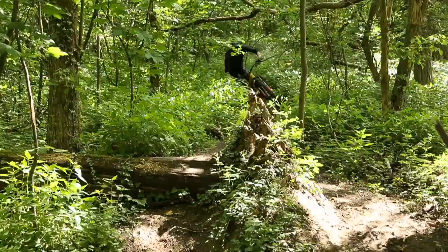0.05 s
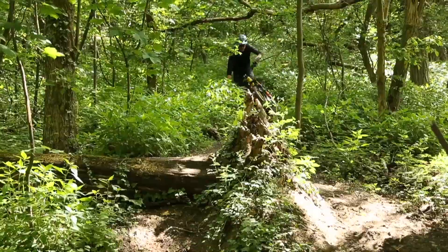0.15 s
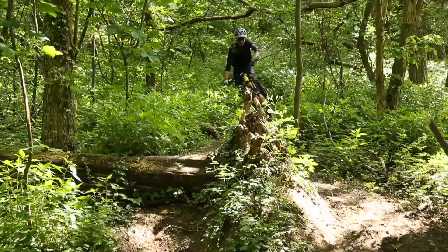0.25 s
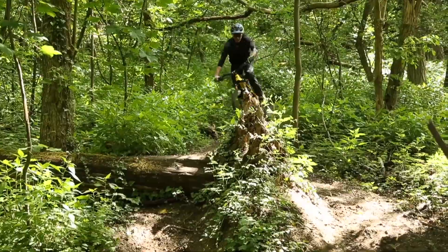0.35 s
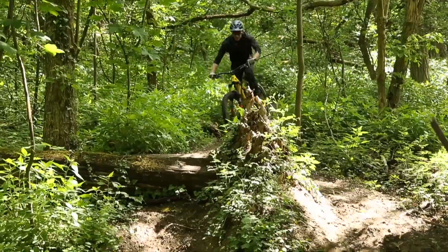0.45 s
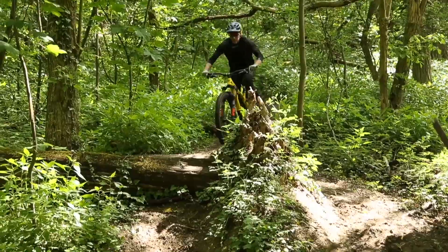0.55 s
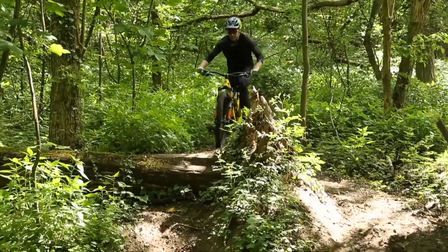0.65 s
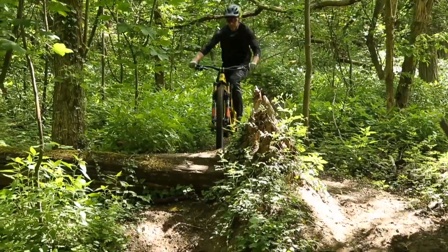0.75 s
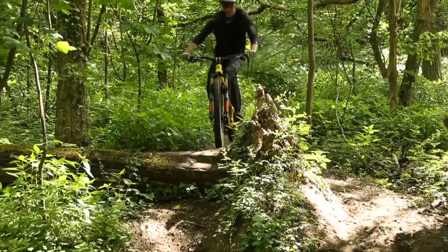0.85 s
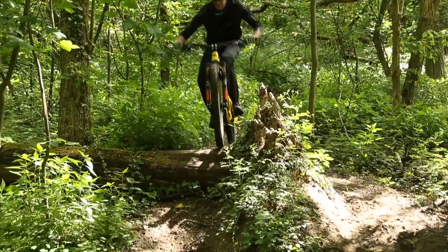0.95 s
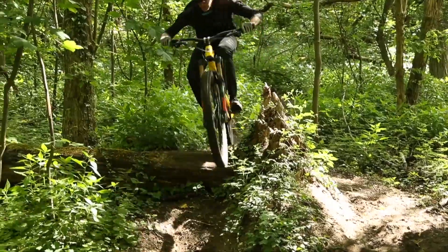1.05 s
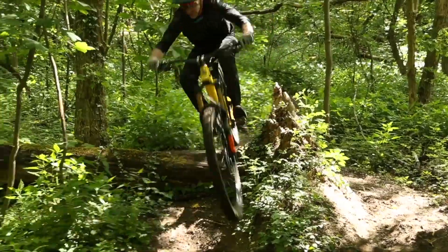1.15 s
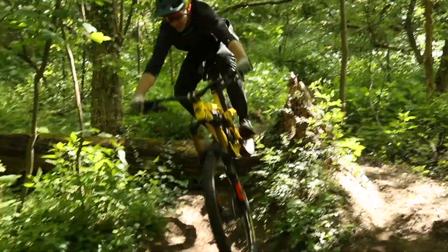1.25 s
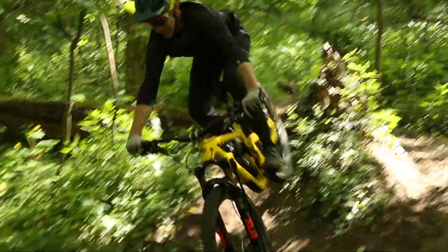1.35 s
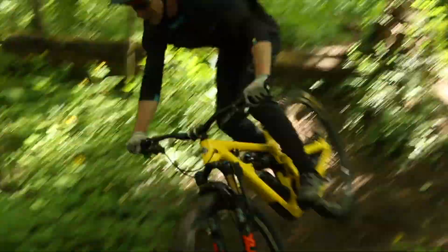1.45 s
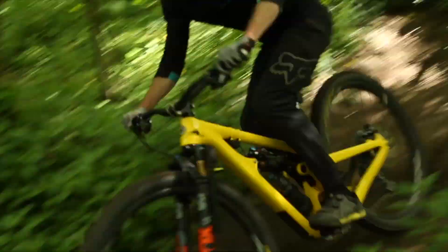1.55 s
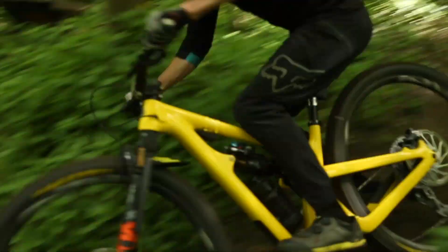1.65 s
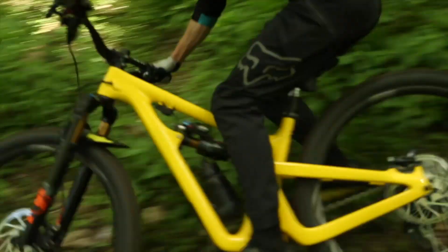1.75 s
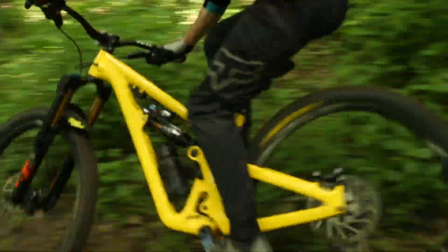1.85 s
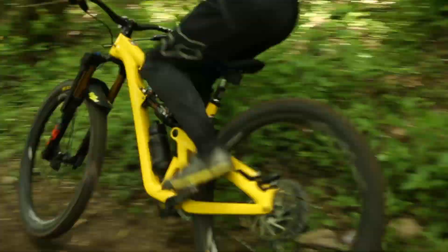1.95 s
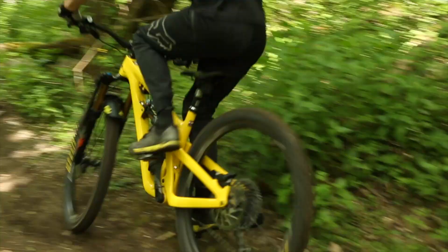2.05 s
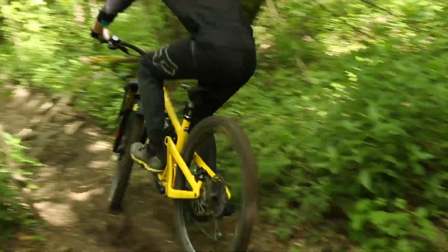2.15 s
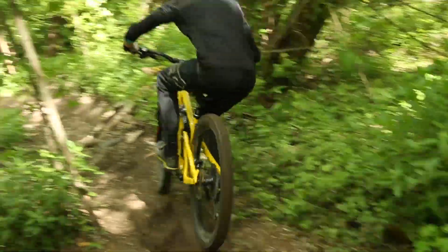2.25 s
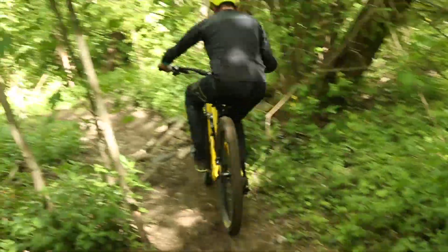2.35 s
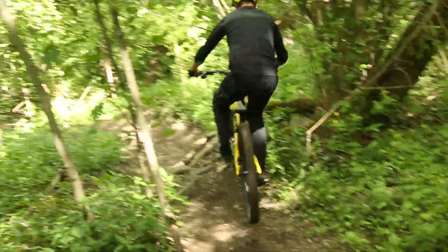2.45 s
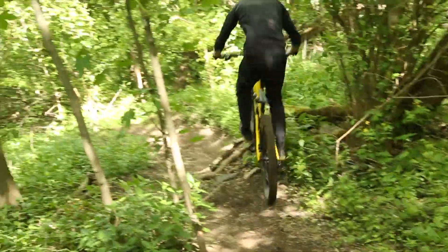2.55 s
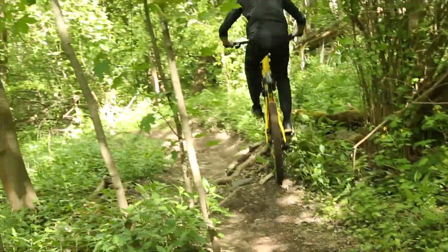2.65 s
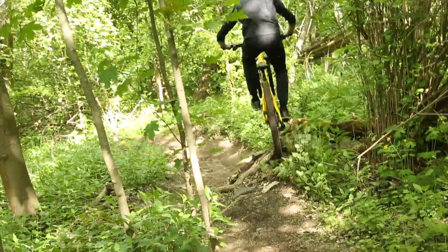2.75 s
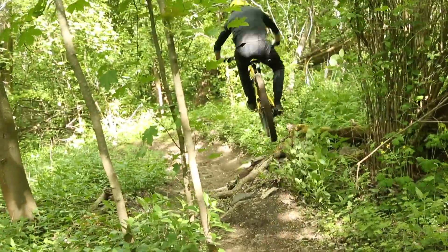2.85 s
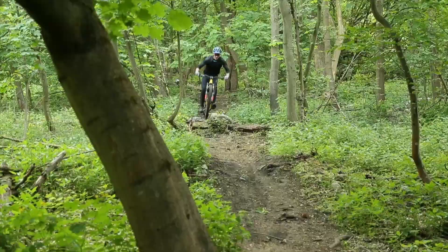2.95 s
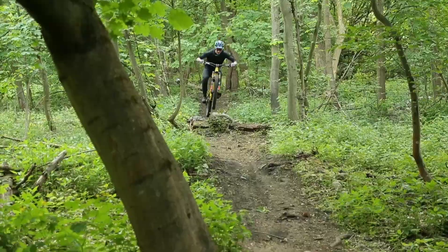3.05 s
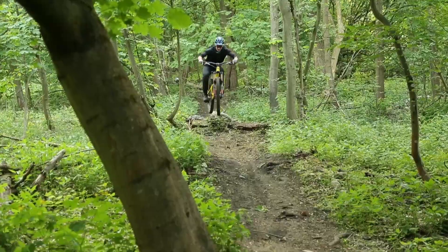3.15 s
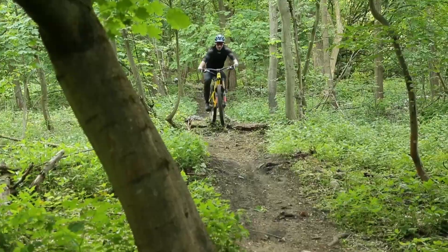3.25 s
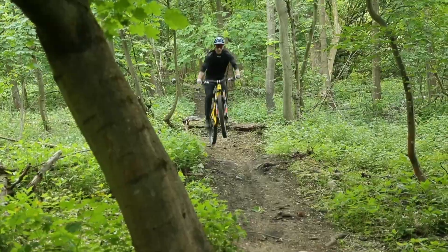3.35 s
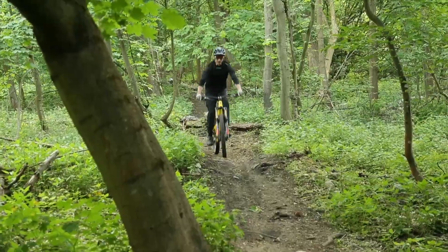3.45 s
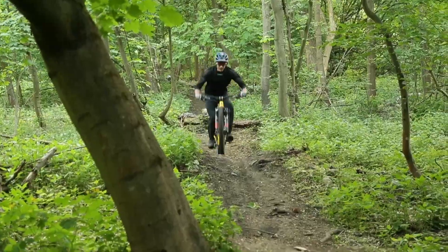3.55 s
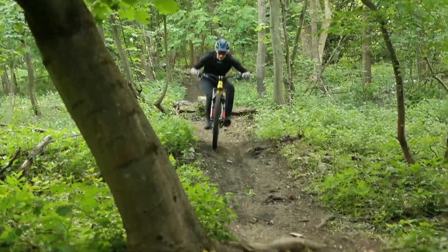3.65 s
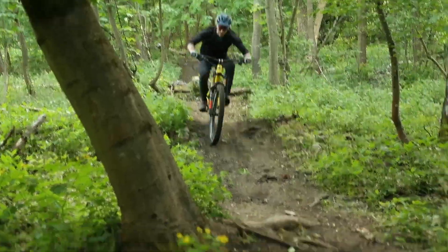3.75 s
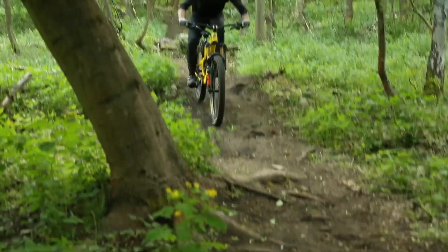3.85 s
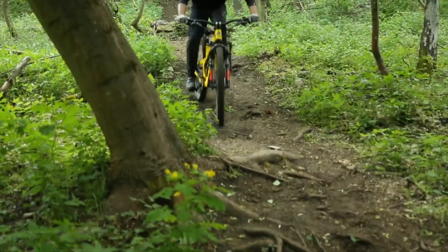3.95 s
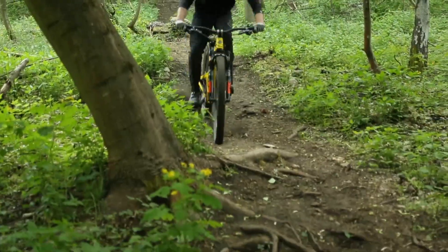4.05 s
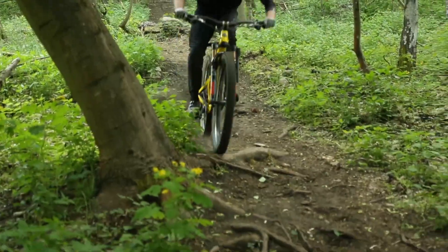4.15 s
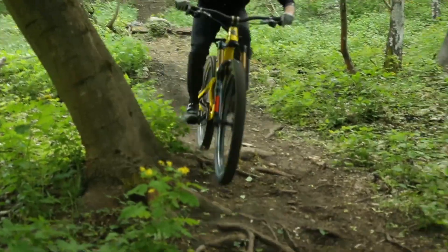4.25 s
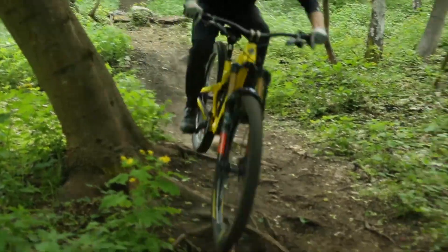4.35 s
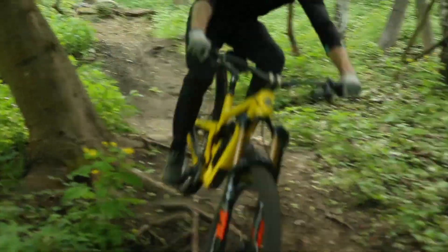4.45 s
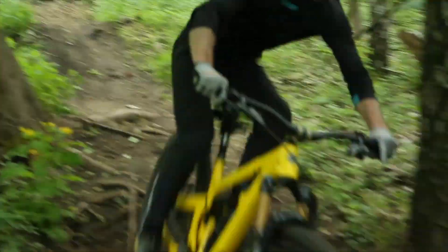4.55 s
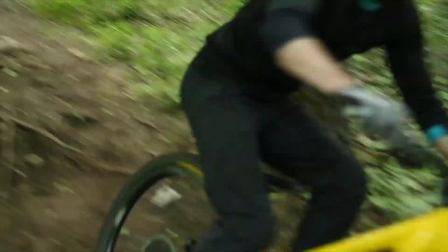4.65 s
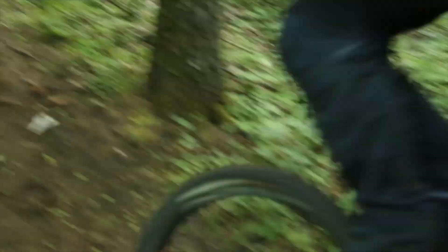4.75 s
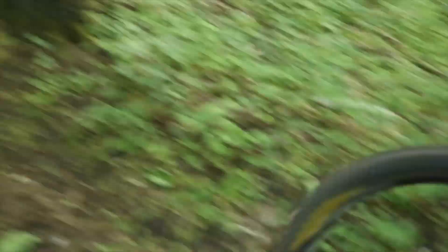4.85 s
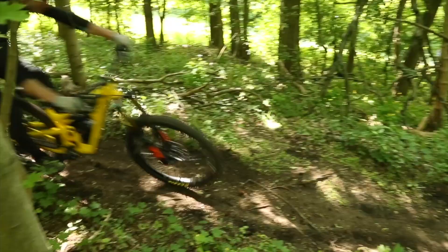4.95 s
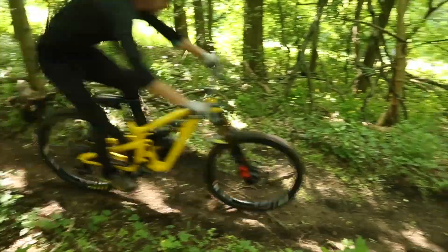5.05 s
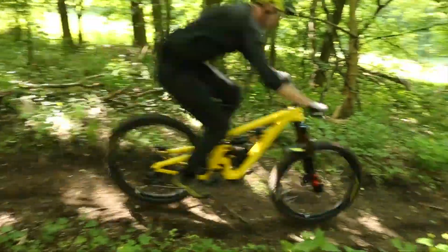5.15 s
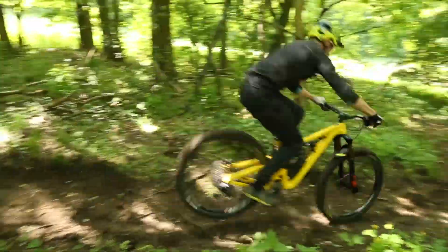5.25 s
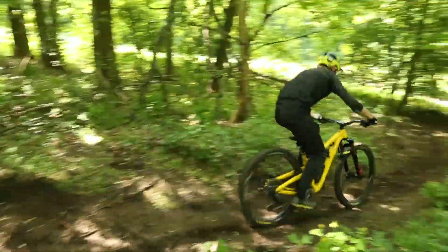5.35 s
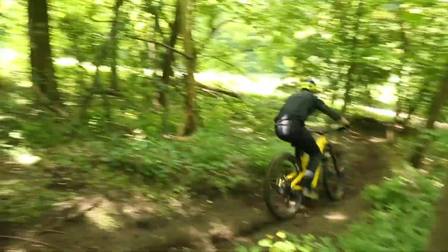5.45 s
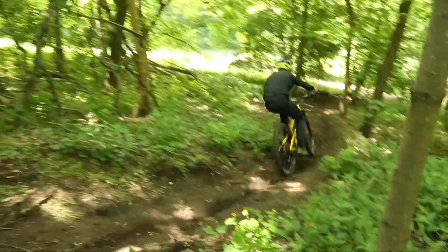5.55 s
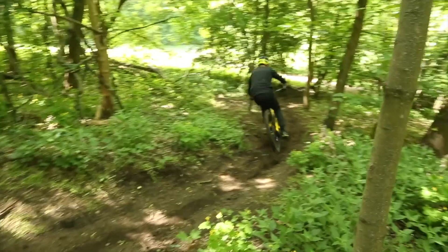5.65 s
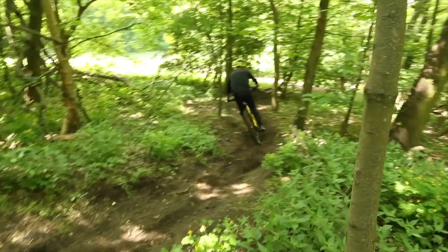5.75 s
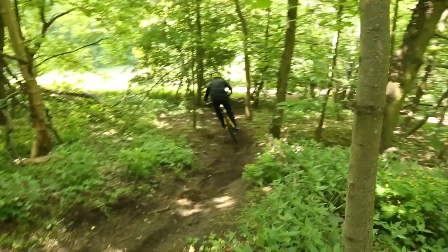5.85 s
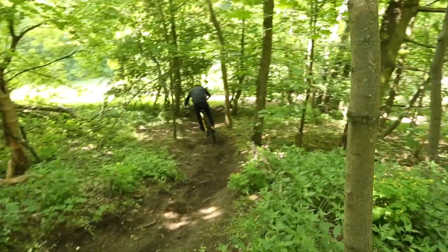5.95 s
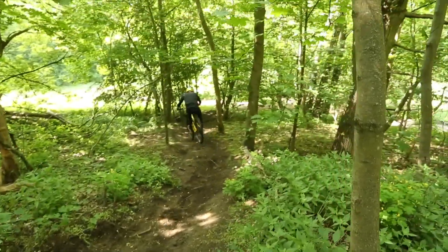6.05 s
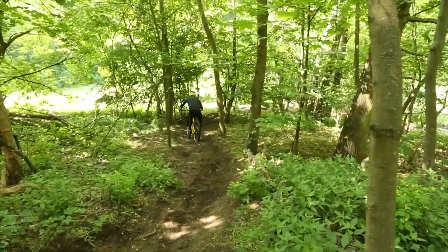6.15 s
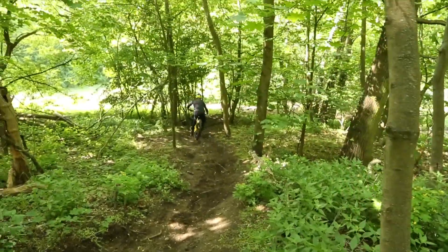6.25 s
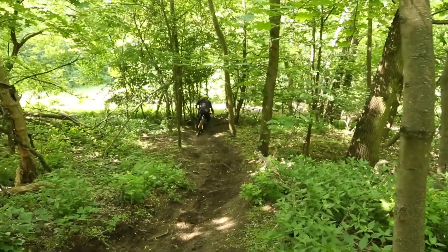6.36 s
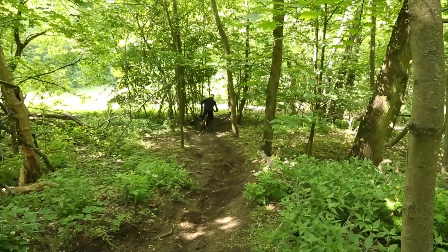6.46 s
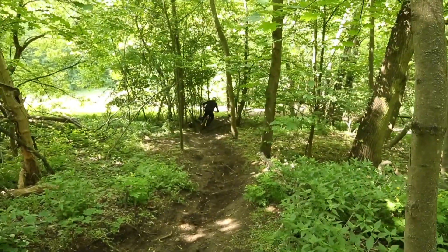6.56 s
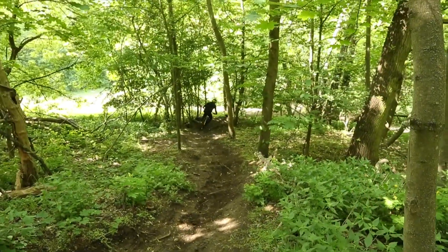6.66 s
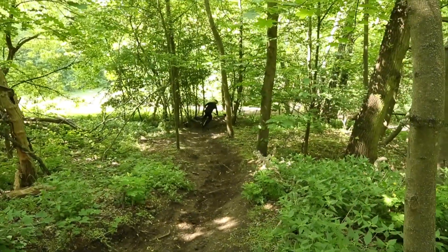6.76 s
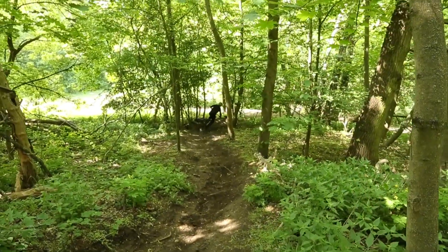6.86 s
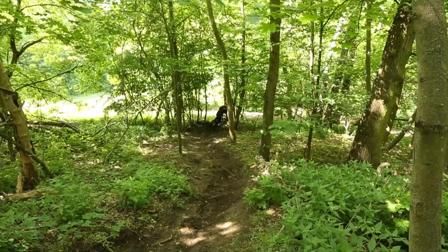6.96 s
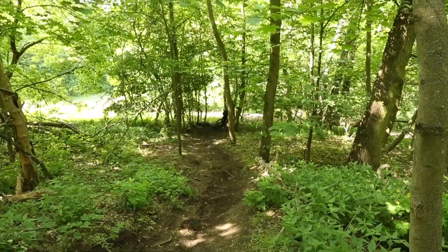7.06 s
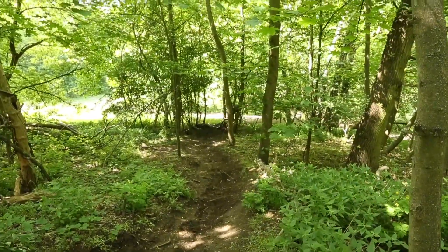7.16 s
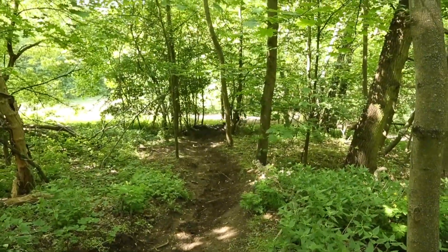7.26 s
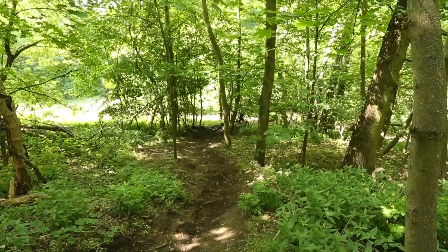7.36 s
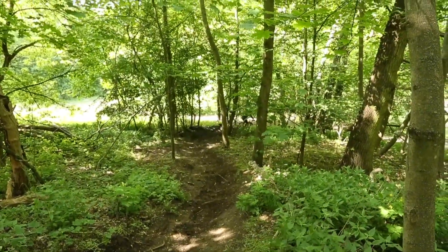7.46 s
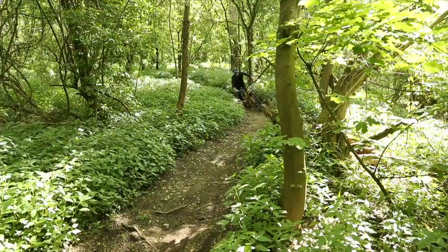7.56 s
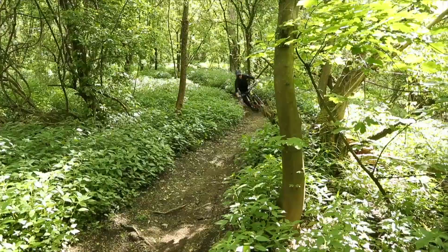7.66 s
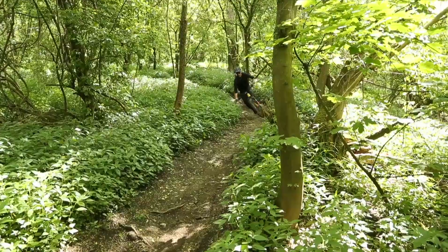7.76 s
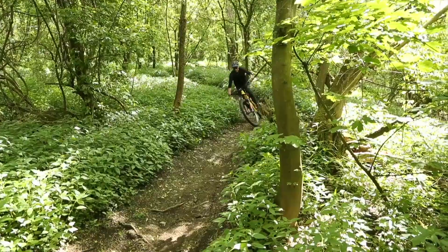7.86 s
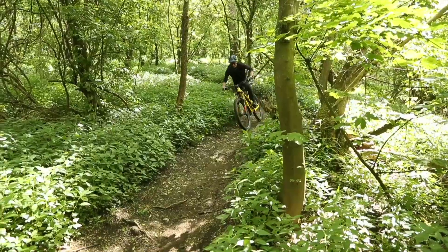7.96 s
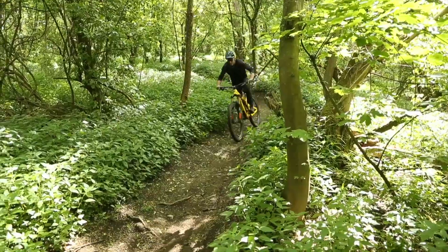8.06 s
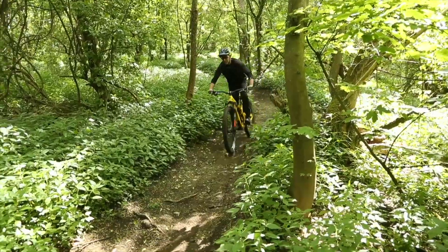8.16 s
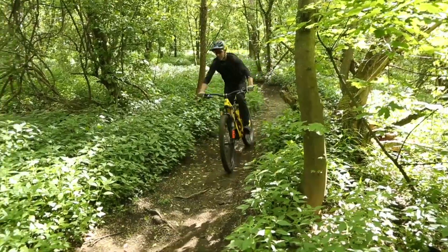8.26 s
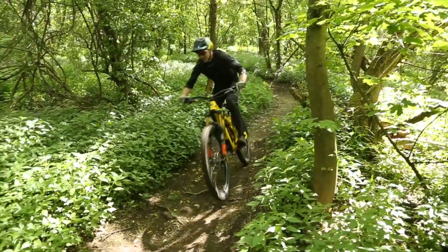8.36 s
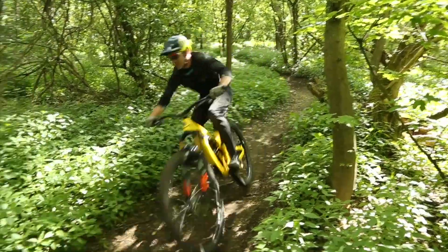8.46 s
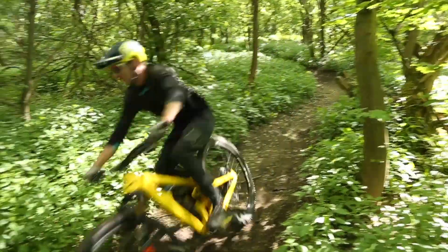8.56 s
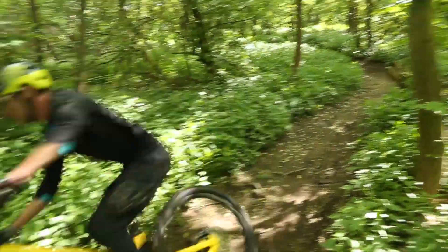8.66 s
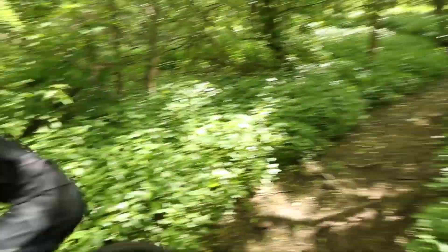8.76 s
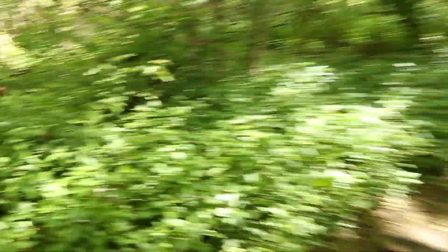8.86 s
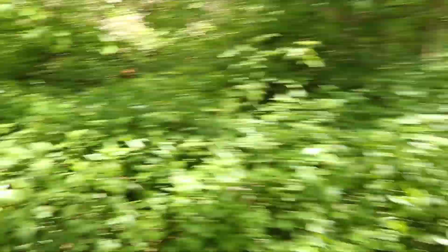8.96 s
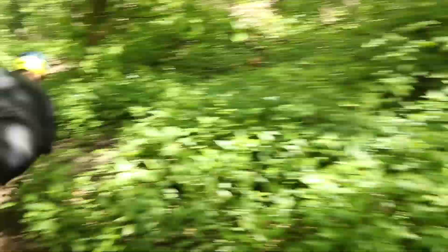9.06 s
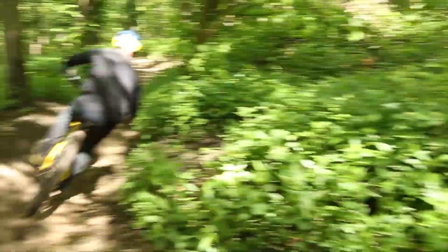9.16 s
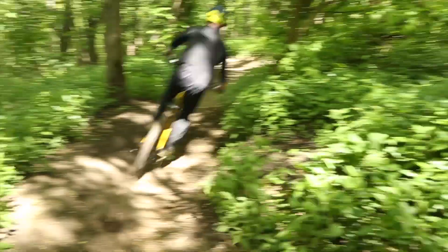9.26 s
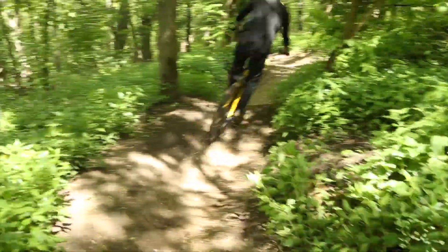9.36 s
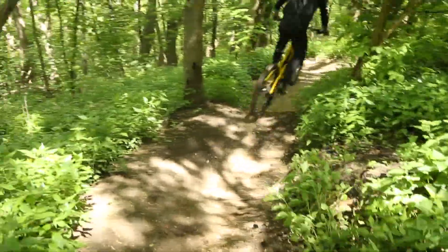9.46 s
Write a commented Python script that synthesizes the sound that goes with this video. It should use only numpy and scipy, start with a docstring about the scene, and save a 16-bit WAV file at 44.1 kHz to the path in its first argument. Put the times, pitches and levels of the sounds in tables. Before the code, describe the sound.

A mountain bike coasts down a dirt trail in quiet woods, passing very close to one microphone on four successive runs with abrupt joins. Each pass grows from a faint freewheel buzz into crunching tyres, deep root thuds, frame rattles and chain ticks, then recedes. The third has the clearest ratchet sizzle, the last the hardest clatter. Knocks leave a short woodland tail.

```python
"""A freewheel ratchet buzzes over the rumble of knobbly tyres, very close to one microphone: a mountain bike
rolls down a dirt trail on four successive passes. Pawl clicks ring the hub and rim and hush when the chain pulls;
grit bursts and noise make the tyres crunch over soil, and the casing booms on roots. Roots and stones knock the
rims and slap the chain on the frame, as hits that ring frame modes; chain and twigs tick. One tyre hums briefly,
the woods return a short tail of each blow, and faint air lies behind it all."""
import sys
import numpy as np
from scipy import signal
from scipy.fft import rfft, irfft, next_fast_len
from scipy.io import wavfile

SR = 44100
rng = np.random.default_rng(int(sys.argv[2]) if len(sys.argv) > 2 else 0)


def how_loud(loudness_db):
    """Turn decibels into a plain amplitude multiplier (0 dB gives 1, 20 dB gives 10)."""
    steps = np.asarray(loudness_db, float) / 20
    return 10 ** steps


def output_pcm(signal):
    """Save a mono or channel-first signal as 16-bit PCM at the path in sys.argv[1].

    Samples are clipped to [-1, 1] before scaling.
    """
    pcm = np.clip(np.atleast_2d(signal).T, -1, 1) * 32767
    wavfile.write(sys.argv[1], SR, np.round(pcm).astype(np.int16))


N = 419832  # samples


def evened(x):
    """Scales to rms 1."""
    return x / np.sqrt(np.mean(x ** 2) + 1e-20)


def columns(tables):
    """Joins tables whose first column is t/s and draws the other columns as lines at every sample."""
    s, *cols = np.transpose(np.concatenate(tables))
    return [np.interp(np.arange(N) / SR, s, c) for c in cols]


def colour(x, points):
    """Filters by a spectrum of (f/Hz, level/dB) points, joined along log frequency."""
    size = next_fast_len(N)
    f, db = np.transpose(points)
    hz = np.fft.rfftfreq(size, 1 / SR)
    gain = how_loud(np.interp(np.log(hz + 1), np.log(f + 1), db))
    return irfft(rfft(x, size) * gain, size)[:N]


def band(x, lo=None, hi=None):
    """Butterworth band between edges in Hz, open where an edge is not given."""
    kind = "bandpass" if lo and hi else "highpass" if lo else "lowpass"
    edges = [lo, hi] if lo and hi else lo or hi
    return signal.sosfilt(signal.butter(4, edges, kind, fs=SR, output="sos"), x)


def resonate(x, hz, width):
    """Two-pole resonance of peak gain about 1, width in Hz."""
    r = np.exp(-np.pi * width / SR)
    return signal.lfilter([1 - r * r, 0, r * r - 1], [2, -4 * r * np.cos(2 * np.pi * hz / SR), 2 * r * r], x)


def impacts(per_s, spread_db):
    """Random clicks of either sign; a few are large."""
    size = how_loud(spread_db * np.minimum(rng.exponential(1, N), 5))
    return size * rng.choice([-1., 1.], N) * (rng.random(N) < per_s / SR)


def wander(hz):
    """Random drift slower than hz, rms 1."""
    return evened(band(rng.standard_normal(N), hi=hz))


def swell(s, rise, hold, fall):
    """0 to 1 and back along straight ramps, full from s + rise for the hold time."""
    return np.interp(np.arange(N) / SR, np.cumsum([s, rise, max(hold, 0), fall]), [0, 1, 1, 0])


def air():
    """Still woods, wind and microphone hiss: coloured noise, faint and slowly breathing."""
    # background spectrum: f/Hz, relative level/dB
    air_spectrum = [(20, -4), (60, 0), (120, -4), (400, -10), (1200, -17.5), (4000, -11), (9000, -36),
                    (16000, -46)]
    level_db = -50.5 + 2.0 * wander(1)
    return how_loud(level_db) * evened(colour(rng.standard_normal(N), air_spectrum))


def woods(x):
    """Ground and trunks return a short scattered tail: sparse random echoes that die away, dulled."""
    tail_db, t60 = -7.5, 0.3  # dB, s
    t = np.arange(SR // 2) / SR
    sparse = (rng.random(len(t)) < .05) * (t > .004)
    taps = rng.choice([-1., 1.], len(t)) * sparse * how_loud(-60 * t / t60)
    echoes = band(taps, hi=3500) / np.linalg.norm(taps)
    return how_loud(tail_db) * signal.fftconvolve(x, echoes)[:N]


def hum():
    """Air in the tyre hums for a moment, a near-pure tone of shifting pitch."""
    # course of the hum: t/s, f/Hz, level/dB
    course = [(7.8, 231.7, -55), (7.834, 227.5, -42), (7.954, 245, -38.5), (8.01, 234, -49),
              (8.03, 234, -67)]
    hz, db = columns([course])
    t = np.arange(N) / SR
    fade = np.clip(np.minimum(t - course[0][0], course[-1][0] - t) / 0.025, 0, 1)
    return np.sqrt(2) * fade * how_loud(db) * np.sin(2 * np.pi * np.cumsum(hz) / SR)


def bumps():
    """As wheels drop over roots the casing gives a deep, damped bounce; also returns how hard it shakes on."""
    # drops over roots: t/s, boom level/dB, f/Hz
    drops = [(0.039, -33, 39.8), (0.118, -33.5, 154), (0.755, -43, 96.9), (1.036, -28, 202),
             (1.222, -36, 188), (1.418, -32, 99.6), (1.55, -23, 113), (1.571, -32, 61.9), (1.696, -26, 199),
             (2.003, -26, 199), (2.059, -33, 121), (2.634, -24.5, 191), (3.519, -38, 61.9),
             (3.597, -25, 91.5), (3.963, -34, 170), (4.048, -32, 135), (4.138, -33, 135), (4.294, -42, 191),
             (4.444, -25, 151), (4.56, -29, 56.5), (4.663, -16, 138), (4.767, -27, 199), (4.809, -23, 156),
             (5.106, -21, 166), (5.419, -20.5, 91.5), (5.599, -37, 199), (5.829, -33, 170),
             (5.929, -27, 198), (6.32, -33, 135), (6.41, -41, 148), (6.498, -30, 80.7), (7.039, -40, 108),
             (7.647, -34, 86.1), (8.312, -30, 159), (8.379, -34, 67.3), (8.635, -12.5, 137),
             (8.7, -18, 180), (8.853, -18, 135), (8.999, -31, 144), (9.23, -31, 200)]
    rise_s, t60, shake_db = 0.0039, 0.067, -4.5  # s, s, dB
    bounce, shake = np.zeros((2, N + SR))
    t = np.arange(SR // 2) / SR
    for s, db, hz in drops:
        shape = how_loud(db - 60 * t / t60) * (1 - np.exp(-t / rise_s))
        part = slice(round(s * SR), round(s * SR) + len(t))
        bounce[part] += shape * 2 * np.sin(2 * np.pi * hz * t)
        shake[part] += shape * how_loud(shake_db)
    return bounce[:N], shake[:N]


def tyres():
    """Knobs crush grit in clumps over a smooth rush; the casing rumbles and booms on the bumps."""
    # rolling, one table a pass: t/s, crunch level/dB, load on the casing/dB
    rolling = [
        [(0.0, -39, -6.5), (0.2, -47.5, -2.5), (0.41, -48.5, -8), (0.75, -43, -7), (1.28, -46, -9.5),
         (1.53, -36.5, -1.5), (1.73, -26.5, -3.5), (1.84, -31, -4.5), (2.35, -40.5, -6), (2.56, -41.5, -0.5),
         (2.73, -45, -5.5), (3.04, -52, -6)],
        [(3.055, -47.5, -11), (3.319, -58, -13), (3.569, -47, -2), (3.693, -39.5, -4.5), (4.043, -50.5, -9),
         (4.173, -33.5, -7), (4.473, -45, -7), (4.643, -33.5, -2), (4.799, -28.5, -2), (4.85, -25.5, -13)],
        [(4.86, -30, -4), (5.22, -46.5, 0.5), (5.41, -32.5, -7), (5.59, -31.5, -5.5), (5.76, -34.5, 0),
         (5.92, -29, -4.5), (6.11, -45.5, -4), (6.41, -34, 1.5), (6.62, -44, -4), (6.83, -46, -1),
         (7.02, -43, -3), (7.2, -47, -2), (7.4, -60, 4), (7.61, -51, -3)],
        [(7.62, -42, 0), (7.672, -42, -5), (7.804, -38, -1.5), (7.99, -44.5, -7), (8.26, -61, 3),
         (8.386, -40, -2), (8.678, -36, -2), (8.816, -26, -2), (8.868, -26.5, -2), (9.016, -28, -2.5),
         (9.25, -37.5, -1.5), (9.52, -33.5, -2.5)],
    ]
    # spectrum of tyre on soil: f/Hz, relative level/dB
    soil = [(12, -51), (20, 0.5), (138, -1), (188, -4), (228, 2), (368, -4), (490, -2), (848, 0),
            (1130, -5.5), (1540, -3), (3300, -9), (4190, -11), (6000, -15), (7800, -56), (13200, -120)]
    boom_split_hz, low_split_hz = 130, 400
    grit_per_s, grit_spread_db, grit_share = 540, 3, 0.47
    boom_db, boom_per_load = -10.5, 1.66  # a loaded casing gains more boom than rumble

    crunch_db, load_db = columns(rolling)
    bounce, shake = bumps()
    puff = rng.standard_normal(200) * np.exp(-np.arange(200) / 11.1)
    grit = signal.oaconvolve(impacts(grit_per_s, grit_spread_db), puff)[:N]
    drive = grit_share * evened(grit) + (1 - grit_share) * rng.standard_normal(N)
    roll = colour(drive * how_loud(2.0 * wander(22.4)), soil)
    roll += 0.54 * resonate(roll, 217, 110)  # air ring inside the tyre

    crunch = how_loud(crunch_db) * evened(band(roll, low_split_hz))
    rumble = how_loud(crunch_db + load_db) * evened(band(roll, boom_split_hz, low_split_hz))
    boom_gain = how_loud(crunch_db + boom_db + boom_per_load * load_db) + shake
    boom = boom_gain * evened(band(roll, hi=boom_split_hz))
    return bounce + crunch + rumble + boom


def snaps():
    """Single sharp ticks of chain and twigs, each one or two cycles around its pitch."""
    # ticks: t/s, peak level/dB before the blows are dulled, f/Hz
    ticks = [(0.757, -35, 1190), (1.038, -25, 2000), (1.551, -15, 3200), (1.5544, -13, 1490),
             (1.627, -17, 1800), (1.6632, -10, 1700), (1.6836, -13, 2110), (1.956, -15, 1500),
             (2.004, -18, 1700), (2.1696, -41, 3130), (2.18, -15, 3900), (2.185, -13.5, 3500),
             (4.0208, -17, 1770), (4.0507, -13.5, 1850), (4.1128, -24, 1500), (4.2283, -11, 3930),
             (4.6478, -15.5, 1470), (4.6648, -9, 1600), (4.7132, -9, 3510), (4.815, -13, 4130),
             (5.1412, -3.5, 4830), (6.383, -35, 3790), (7.632, -18, 4650), (7.635, -27, 1960),
             (7.635, -13.5, 2620), (8.3754, -5, 4900), (8.5805, -8, 4640), (8.6364, -7, 3260),
             (8.6377, -6.5, 2170), (8.69, -17, 2180), (8.703, -2.5, 2280), (8.773, -12, 1750),
             (8.777, -6, 1500), (8.831, -19, 1710), (8.8634, -21, 1700), (8.896, -9.5, 1300),
             (9.0225, -9, 1860)]
    out, t = np.zeros(N + SR), np.arange(200) / SR
    for s, peak_db, hz in ticks:
        tick = np.sin(2 * np.pi * hz * t) * np.exp(-.7 * hz * t)
        out[round(s * SR):][:len(t)] += how_loud(peak_db) * tick / abs(tick).max()
    return out[:N]


def knocks():
    """Each blow is a hard hit and a short rattle that ring frame modes near its pitch, with thud, crack, scuff."""
    # blows on rims and frame: t/s, body peak level/dB before dulling, f/Hz,
    # thud level/dB over the body, crack level/dB over the body
    blows = [(0.408, -22.5, 689, -29, -11), (0.609, -24.5, 711, -18, -16), (0.756, -22.5, 554, -20, -23),
             (1.035, -25, 659, -21, -16), (1.22, -26.5, 818, -8, -16), (1.421, -22.5, 767, -3, 3),
             (1.551, -9.5, 738, -16, -23), (1.569, -7, 1100, -18, -14), (1.58, -14, 1080, -13, -11),
             (1.619, -16.5, 676, -20, -9), (1.681, -10.5, 969, -20, -9), (1.694, -12, 762, -22, -14),
             (1.711, -17, 759, -20, -14), (1.748, -19, 778, -16, -16), (1.823, -16, 418, -19, 0),
             (1.947, -19, 624, -18, -16), (1.953, -13.5, 614, -19, -6.5), (1.986, -18.5, 401, -7, -21),
             (2.005, -14, 1100, -14, -14), (2.054, -16.5, 1020, -14, -7), (2.083, -21.5, 436, -7, -16),
             (2.106, -23, 1690, -16, -18), (2.164, -30, 1270, -16, -18), (2.178, -20, 904, -16, -4),
             (2.263, -18.5, 750, -10, -16), (2.28, -16.5, 732, -16, -6), (2.551, -21, 1400, -8, -16),
             (2.633, -19, 1300, -4, -16), (3.521, -22, 1030, -8, -18), (3.597, -17, 447, -13, -14),
             (3.827, -24.5, 778, -10, -20), (3.966, -28, 409, -12, -16), (3.997, -20.5, 1940, -16, -20),
             (4.002, -29, 1350, -18, -20), (4.019, -18, 1080, -11, -26), (4.032, -14, 1340, -22, -24),
             (4.049, -16, 853, -20, -25), (4.112, -23, 1390, -19, -16), (4.24, -23.5, 606, -10, -16),
             (4.294, -17, 1200, -10, -16), (4.444, -16, 487, -5, -19), (4.56, -19.5, 506, -1, -22),
             (4.646, -27, 646, -18, -25), (4.664, -4.5, 716, -11, -29), (4.713, -14, 826, -11, -16),
             (4.768, -15, 1310, -18, -14), (4.911, -17.5, 821, -16, -16), (4.941, -17, 1950, -24, -16),
             (5.107, -18, 713, -7, -16), (5.158, -13.5, 1020, -16, -16), (5.421, -12, 990, -19, -22),
             (5.432, -20, 888, -19, -16), (5.44, -12, 401, -13, -21), (5.501, -17, 727, -14, -16),
             (5.626, -18, 1180, -10, -16), (5.694, -22, 870, -16, -16), (5.757, -22, 536, -16, -16),
             (5.8, -18, 1340, -7, -18), (5.881, -13, 830, -17, -6), (5.933, -16, 925, -30, -16),
             (6.0, -22.5, 824, -23, -16), (6.032, -19, 641, -13, -16), (6.157, -24.5, 654, -11, -16),
             (6.321, -14.5, 626, -28, -29), (6.38, -16, 950, -13, -7), (6.411, -13.5, 670, -16, -21),
             (6.435, -17, 721, -16, -16), (6.475, -21, 592, -11, -5), (6.821, -22, 1200, -23, -16),
             (6.832, -19, 867, -16, -10), (6.908, -22, 721, -13, -16), (6.977, -28, 619, -16, -16),
             (7.031, -23.5, 603, -14, -16), (7.097, -26.5, 517, -23, -16), (7.634, -19, 1060, -10, -1.5),
             (7.66, -13.5, 498, -21, -17), (7.709, -20, 999, -19, -18), (7.869, -24.5, 565, -21, -16),
             (8.202, -23.5, 573, -16, -16), (8.229, -20.5, 2000, -16, -18), (8.273, -14.5, 611, -14, -22),
             (8.312, -10, 598, -3.5, -30), (8.322, -14.5, 1430, -28, -22), (8.401, -15.5, 506, -16, -16),
             (8.446, -13, 614, -15, -13), (8.537, -20.5, 563, -16, -19), (8.579, -19, 1620, -14, -13),
             (8.634, -8, 495, -20, -4.5), (8.642, -7, 721, -14, -16), (8.686, -9, 829, -9, -12),
             (8.701, -4.5, 1640, -10, -16), (8.769, -3, 1150, -19, -12), (8.854, -8.5, 851, -20, -4),
             (8.892, -15, 400, -12, -16), (8.939, -8.5, 896, -21, -2), (9.021, -12, 1880, -21, -16),
             (9.158, -19, 587, -16, -16), (9.231, -15, 401, -9, -24), (9.24, -15.5, 565, -13, -16)]
    # frame modes, the two deepest make the thud: f/Hz, level/dB, t60/s
    frame_modes = [(79.4, 2, 0.07), (228, -11.5, 0.025), (308, 6.5, 0.021), (603, 5, 0.017),
                   (749, 9, 0.036), (1037, 9.5, 0.018), (1350, 12, 0.034), (1800, 7, 0.012),
                   (2520, 10, 0.0079)]
    rattle_s, rattle_spread = 0.032, 0.13  # typical length, random share of it
    build_s = 0.0021  # the rattle builds over this time
    bite = 2.5  # the bare blow reaches this multiple of its pitch
    scuff_db, scuff_t60 = -12.5, 0.24  # the tyre scrubs on after each blow

    out, t = np.zeros(N + SR), np.arange(SR // 5) / SR
    for s, peak_db, pitch_hz, thud_db, crack_db in blows:
        length_s = rattle_s * (1 + rattle_spread * rng.standard_normal())
        rattle, hiss, scrub = rng.standard_normal((3, len(t)))
        detune, strength = rng.standard_normal((2, len(frame_modes)))
        decay = how_loud(-60 * (t / max(length_s, .005)) ** 1.55)  # holds briefly, then dies
        hit = 2.77 * np.exp(-t / 0.0004)
        # spiky: several small impacts follow the hit
        push = hit + rattle * abs(rattle) * decay * (1 - np.exp(-t / build_s))

        modes = []
        for (hz, db, t60), d, k in zip(frame_modes, detune, strength):
            near_db = -5 * abs(np.log2(hz / pitch_hz))
            ring = resonate(push, hz * (1 + 0.12 * d), np.log(1000) / np.pi / t60)
            modes.append(how_loud(db + near_db + 3.4 * k) * ring)

        body = sum(modes[2:]) + 0.17 * band(push, 144, bite * pitch_hz)
        thud = modes[0] + 1.25 * modes[1]
        crack = band(hiss * abs(hiss) * decay ** 0.34, 3870, 7600)
        scuff = band(scrub * how_loud(-60 * t / scuff_t60), 140, 1490)
        layers = (0, body), (thud_db, thud), (crack_db, crack), (scuff_db, scuff)
        blow = sum(how_loud(db) * p / abs(p).max() for db, p in layers)
        out[round(s * SR):][:len(t)] += how_loud(peak_db) * blow
    return out[:N]


def chain_hush():
    """The chain's pull hushes the pawls: depth in dB, deepening over about the first third of a pull,
    then held and eased off over a fixed short time."""
    # chain pulls: t/s, length/s, depth/dB
    chain_pulls = [(0.134, 0.19, 2.5), (0.637, 0.018, 2), (1.074, 0.018, 0), (1.509, 0.088, 9),
                   (1.88, 0.28, 8.5), (2.122, 0.035, 7), (2.185, 0.01, 19), (3.545, 0.026, 2.5),
                   (3.93, 0.23, 7.5), (4.57, 0.088, 15.5), (5.977, 0.057, 4), (6.107, 0.03, 2),
                   (6.23, 0.11, 6), (6.398, 0.064, 3.5), (6.812, 0.12, 11), (6.946, 0.016, 4),
                   (7.539, 0.15, 8), (8.605, 0.024, 6), (8.714, 0.043, 9), (8.782, 0.019, 10.5),
                   (8.872, 0.0089, 8.5), (9.059, 0.025, 2.5)]
    tighten_share, ease_off_s = 0.35, 0.037
    return sum(db * swell(s, tighten_share * length, (1 - tighten_share) * length, ease_off_s)
               for s, length, db in chain_pulls)


def freewheel():
    """Several pawls click out of step; each ring swells and fades as the wheel turns past."""
    # coasting, one table a pass: t/s, buzz level/dB, hub turned to the microphone/dB
    coasting = [
        [(0.0, -43, 1), (0.4, -41.5, 2.5), (1.07, -40, 2.5), (1.34, -33.5, 0.5), (1.4, -35.5, 3),
         (1.45, -32.5, -3), (1.5, -34.5, 4.5), (1.65, -32, 0), (1.76, -30, -1.5), (2.0, -34, 7),
         (2.35, -32, 2.5), (2.55, -34, -0.5), (2.75, -37, 0.5), (3.045, -40.5, 1)],
        [(3.055, -48.5, -3), (3.26, -44, -1.5), (3.55, -44.5, -2.5), (3.62, -39, -2.5), (3.78, -44, -2.5),
         (3.9, -39.5, -1), (4.22, -34, 1.5), (4.36, -35, 0), (4.5, -31.5, 1.5), (4.74, -30, -1.5),
         (4.79, -30, -1), (4.83, -27.5, -2)],
        [(4.87, -29.5, -4.5), (5.1, -22.5, 6.5), (5.2, -20, 9), (5.33, -25, 6), (5.7, -27.5, 3.5),
         (5.81, -31, 5), (5.95, -29, 4.5), (6.1, -29.5, 3.5), (6.18, -29.5, 3.5), (6.4, -35.5, 5),
         (6.54, -34, 3), (6.74, -37, 2.5), (7.07, -33, 5), (7.17, -38.5, 5), (7.36, -40.5, 5), (7.61, -45.5, 1)],
        [(7.62, -38.5, -4), (7.88, -39, 4), (7.98, -36.5, 1), (8.2, -36.5, 1.5), (8.37, -32.5, -1.5),
         (8.56, -30.5, 1.5), (8.6, -30.5, -1.5), (8.85, -22, 10.5), (9.04, -21.5, 6), (9.16, -27.5, 2.5),
         (9.52, -32, 0.5)],
    ]
    # hub and rim rings: f/Hz, width/Hz, relative level/dB
    pawl_rings = [(2508, 196, 3), (2794, 310, 2.5), (4180, 500, 5), (4900, 920, -5), (6670, 680, -5),
                  (7850, 1060, 0.5), (8430, 240, -1), (8880, 700, -1.5), (11750, 2700, -3.5)]
    # bare click of a pawl: f/Hz, relative level/dB
    click_spectrum = [(880, -7), (1500, 4.5), (2000, 0.5), (2460, -17.5), (3250, 3.5), (4160, -6),
                      (6960, 0), (7920, 8), (13500, -34), (16000, -87)]
    # moments when one ring of the wheel sings out: t/s, length/s, f/Hz, level/dB before its fade in and out
    sung_rings = [(1.67, 0.092, 4180, -34), (2.45, 0.15, 3850, -40), (4.694, 0.05, 3450, -27),
                  (4.8, 0.047, 4050, -22), (5.026, 0.14, 7850, -24), (4.9, 0.18, 2290, -34.5),
                  (5.135, 0.028, 4900, -20), (5.254, 0.057, 2380, -36), (9.18, 0.29, 3900, -34)]
    clicks_per_s, click_spread_db, ring_db = 1500, 2.2, 5
    mid_split_hz, top_split_hz = 5300, 10500
    top_db, top_per_facing = -11.5, 0.3  # turned away from the hub, the side of the wheel throws more sizzle
    top_hush, top_hush_max_db = 1.9, 26  # the sizzle dies deeper than the buzz, down to a limit
    rim_hush = 0.98  # the rim ring dies a little less

    coast_db, facing_db = columns(coasting)
    hush_db = chain_hush()
    buzz_db = coast_db - hush_db
    rim_db = coast_db - facing_db - rim_hush * hush_db
    sizzle_hush_db = top_hush_max_db * np.tanh(top_hush * hush_db / top_hush_max_db)
    sizzle_db = coast_db + top_db - top_per_facing * facing_db - sizzle_hush_db

    clicks = impacts(clicks_per_s, click_spread_db) * how_loud(2.85 * wander(33.6))
    clicks = evened(clicks) + 1.52 * rng.standard_normal(N)
    rings = sum(how_loud(db + 2.7 * wander(11.2)) * resonate(clicks, hz, width) for hz, width, db in pawl_rings)
    bare_db = 0.12 * (buzz_db + 34.0) - ring_db  # from further off mostly the rings carry
    buzz = how_loud(bare_db) * evened(colour(clicks, click_spectrum)) + evened(rings)

    out = how_loud(rim_db) * evened(band(buzz, hi=mid_split_hz))
    out += how_loud(buzz_db) * evened(band(buzz, mid_split_hz, top_split_hz))
    out += how_loud(sizzle_db) * evened(band(buzz, top_split_hz))
    for s, length, hz, db in sung_rings:
        part = slice(round(s * SR), round((s + length) * SR))
        ring = evened(resonate(clicks[part], hz, 80))
        out[part] += how_loud(db) * ring * signal.windows.hann(len(ring))
    return out


def scene():
    """Bike, woods and air reach one microphone, which feeds both channels."""
    blows = band(knocks() + snaps(), hi=7500)  # rubber and padding dull every blow
    mono = air() + woods(blows) + hum() + tyres() + blows + freewheel()
    return np.array([mono, mono])


def low_pass(x):
    """Removes everything above the highest recorded frequency."""
    return signal.sosfilt(signal.butter(12, 16340, fs=SR, output="sos"), x)


def record(dry):
    """The microphone rolls off deep bass, full scale clips the tallest peaks and a filter limits the treble."""
    thinned = signal.sosfilt(signal.butter(2, 48.3, "highpass", fs=SR, output="sos"), dry)
    clipped = np.clip(thinned, -1, 1)
    treble_limit = signal.firwin(511, 15780, window=("kaiser", 9), fs=SR)
    mix = signal.oaconvolve(clipped, treble_limit[None], "same")
    return low_pass(mix)


dry = scene()
out = record(dry)
output_pcm(out)
```